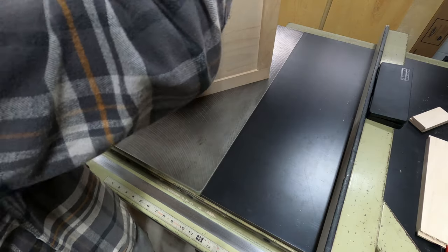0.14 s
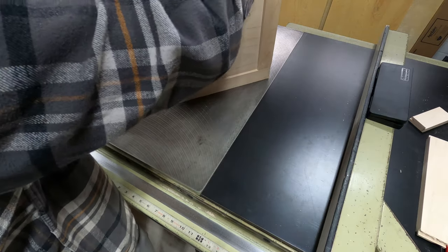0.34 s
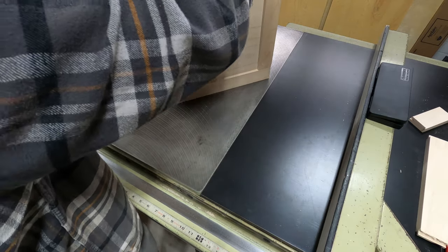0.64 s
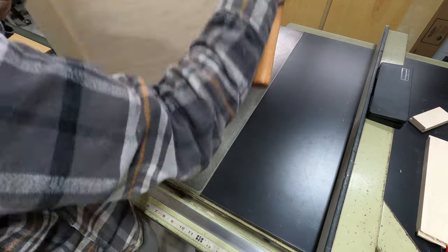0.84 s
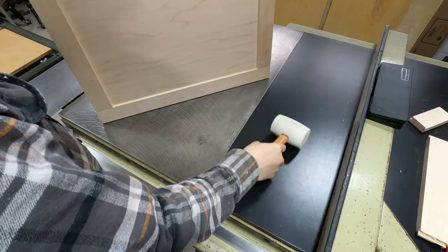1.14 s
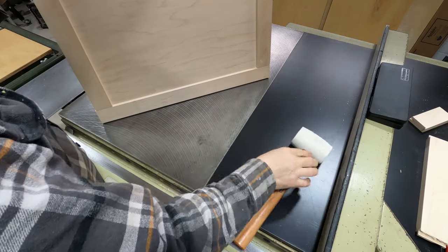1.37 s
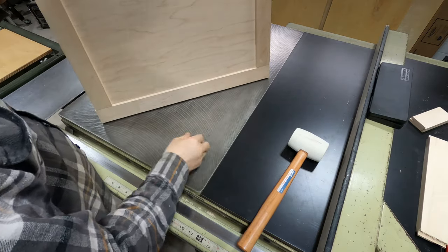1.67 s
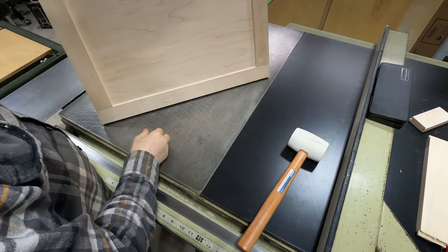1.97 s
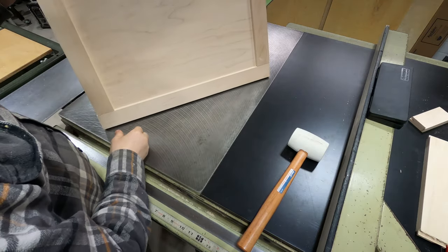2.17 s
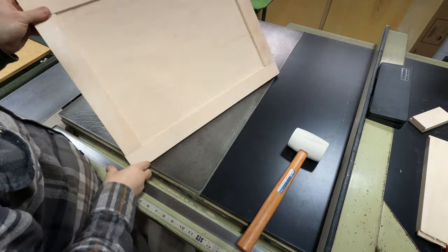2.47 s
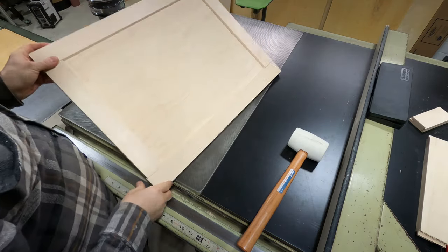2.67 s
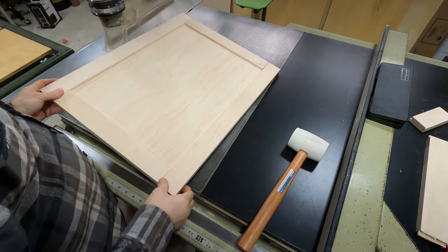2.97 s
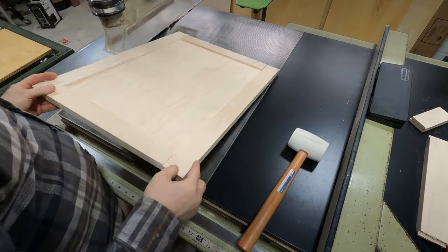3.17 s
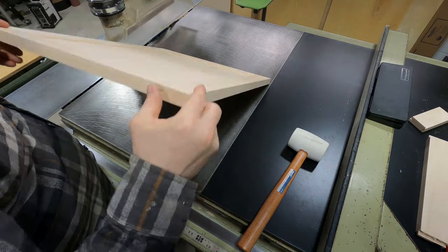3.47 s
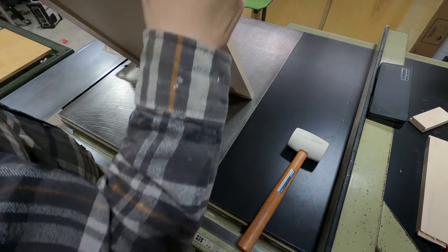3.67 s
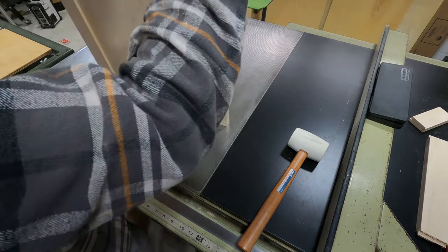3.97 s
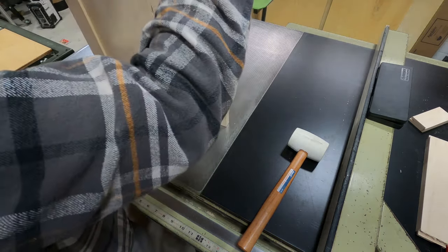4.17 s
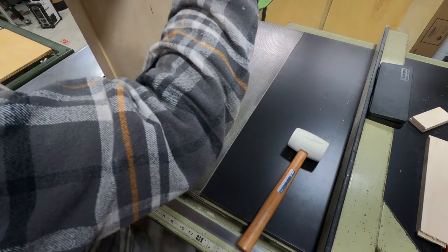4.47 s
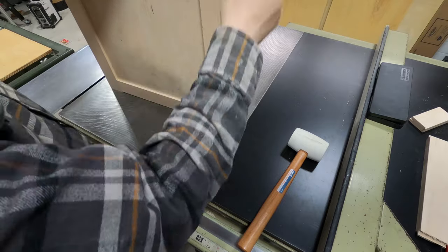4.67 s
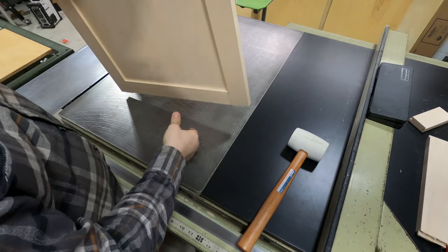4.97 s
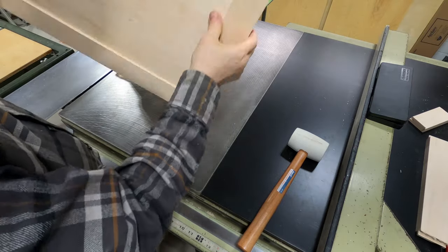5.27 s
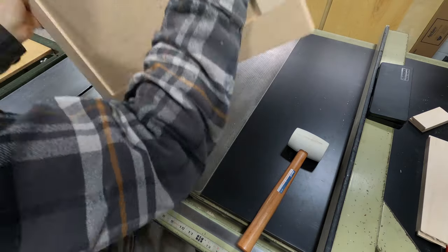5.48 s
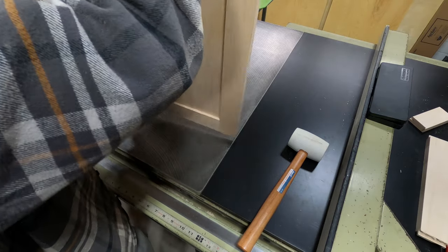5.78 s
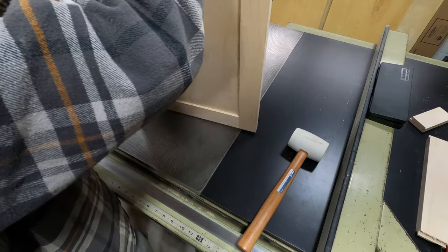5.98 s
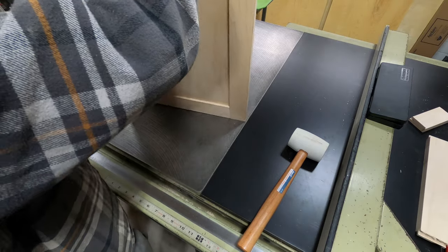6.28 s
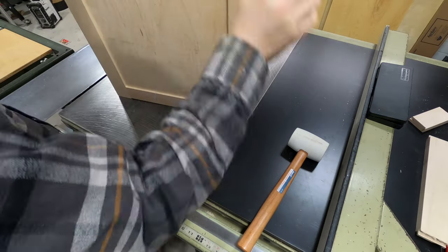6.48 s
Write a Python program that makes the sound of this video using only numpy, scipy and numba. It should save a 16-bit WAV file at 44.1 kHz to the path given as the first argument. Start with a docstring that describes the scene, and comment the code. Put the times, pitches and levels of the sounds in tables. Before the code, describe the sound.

In a workshop, a rubber mallet gives two dull, briefly ringing knocks on a wooden door frame, then clatters down on a steel table. The door is turned with soft rubs and a bump, and slides over the table with a gritty, hissing scrape. After a few lighter drags it drops on its edge in a cluster of hollow knocks. Everything sounds close, over a low rumble and ventilation hum.

```python
"""In a workshop, a rubber mallet knocks twice on a wooden door frame, which rings briefly.
At 1.4 s the mallet clatters onto a steel table. The door is then turned and set down with bumps and rubs.
From 3.5 s it slides over the table, where grit makes the wood hiss and sing; at 6.1 s it drops on its edge.
A ventilation hum and a low rumble fill the room throughout, and a limiter holds the loudest blows down."""
import sys
import numpy as np
from scipy import signal
from scipy.fft import rfft, irfft, next_fast_len
from scipy.io import wavfile
from scipy.ndimage import uniform_filter1d, minimum_filter1d, map_coordinates
from numba import njit

SR = 44100
rng = np.random.default_rng(int(sys.argv[2]) if len(sys.argv) > 2 else 0)


def transcribe(signal):
    """Save signal, clipped to [-1, 1], as a 16-bit WAV file at the path in sys.argv[1]."""
    frames = np.atleast_2d(signal).T
    limited = np.clip(frames, -1, 1)
    pcm = np.round(limited * 32767).astype(np.int16)
    wavfile.write(sys.argv[1], SR, pcm)


N = 291942

# The loose door's modes (the tones it rings with): f/Hz, level/dB, nominal time to fade by 60 dB/s
DOOR_MODES = [(102.86, -7.5, 0.42), (151.7, 2, 0.48), (198, -2.5, 0.6), (257.4, -4, 0.53),
              (296.8, -0.5, 0.89), (336.7, 4.5, 0.27), (390, -6.5, 0.55), (508.3, 4, 0.5),
              (625, -3.5, 0.32), (697, 2, 0.53), (946, -10.5, 0.33), (1176, -7.5, 0.089), (1445, -13, 0.11),
              (1590, -12.5, 0.1), (1935, -18, 0.24), (2260, -25.5, 0.39), (2817, -30, 0.054)]
# How alike left and right are for a sound close by: f/Hz, likeness/0-1
NEAR_LIKENESS = [(100, 1), (700, 0.93), (2000, 0.83), (5000, 0.73), (10000, 0.71)]


def mallet_blows():
    """Soft rubber hits the wooden frame: two strong knocks among fainter touches."""
    # t/s, strength/dB, f/Hz, dullness/dB per octave, boom/dB, click/dB, freedom to ring/0-1, bite/dB
    hits = [(0.0014, -29.5, 162, 10, -34.5, -24, 0.75, -2.5), (0.474, -22.5, 250, 14, -44, -22, 0, 13),
            (0.481, 5, 243, 15, -8, -5.5, 0.2, 3), (0.5, -6.5, 314, 12.5, -38, -20.5, 0.57, 5),
            (0.688, -3, 266, 14.5, -14.5, 0, 0.2, -10.5), (0.701, -7.5, 280, 16, -8, -10, 0.29, 3.5),
            (0.722, -22.5, 318, 28, -29, -8, 0.1, -2), (0.87, -36, 157, 17, -27.5, -13, 0.46, -10)]
    # The frame's modes: f/Hz, level/dB, nominal fade time/s
    modes = [(81.6, -21.5, 0.75), (125.6, -8, 1), (150, 0.5, 0.18), (201, -3.5, 0.082), (264, -6, 0.14),
             (293, -12.5, 0.17), (347.6, -8.5, 0.24), (545, 3, 0.14), (565, -14.5, 0.16), (620, -27, 0.36),
             (1073, -18.5, 0.15), (1338, -16.5, 0.44), (1710, -33, 0.2)]
    return knocks(hits, modes, soft_s=0.0036, ring_db=2.5, crack_db=18.5, click_db=15.5,
                  wet_db=-4.5, bend=0.72)


def mallet_laid_down():
    """The mallet's head and handle drop on the steel table and make it ring."""
    # Each touch on the table: columns as in mallet_blows
    hits = [(1.398, -19, 193, 13, -25, 24.5, 0.46, 5.5), (1.435, -11.5, 235, 12.6, -16.5, 4, 0.33, -3.5),
            (1.46, -25, 189, 2.6, -8, 7, 0.074, -3.5), (1.513, -1, 548, 6.96, -31.5, 18, 0.13, -4),
            (1.556, -20, 179, 29, -17, -4, 0.45, 2), (1.662, -26.5, 176, 5.1, -33, -18, 0.13, 8),
            (1.74, -39, 171, 7.5, -32, -15, 0.37, 19)]
    # The table's modes: f/Hz, level/dB, nominal fade time/s
    modes = [(114.7, -3, 0.31), (142.4, 5.5, 0.17), (197.4, 0, 5.0), (282, -5, 0.24), (343, -4.5, 5.0),
             (518, -2.5, 0.33), (604, -10, 0.043), (670, -4.5, 0.069), (890, -18, 0.08), (1320, -14, 0.2),
             (1760, -18, 0.23)]
    return knocks(hits, modes, soft_s=0.0013, ring_db=0.5, crack_db=18.5, click_db=-20.0,
                  wet_db=-2.0, bend=1.23)


def door_bumps():
    """Corners and edges of the door hit the table, and the door rings."""
    # Each bump: columns as in mallet_blows
    hits = [(2.638, -23.5, 420, 7.9, -20.5, -5, 0.36, -16), (3.391, -7, 295, 6.33, -49, 17, 0.42, 5.5),
            (3.426, -13.5, 340, 4.57, -35, 12, 0.3, 4), (3.927, -41.5, 202.6, 0.67, -28, 5, 0.88, 1),
            (4.19, -48, 198, 1.1, -60, -12, 0.5, -3), (4.228, -44.5, 497, 5.8, -40.5, -9, 0.35, -3.5),
            (4.999, -54, 522, 4, -51, -5.5, 0.32, 3), (5.302, -54.5, 433, 2.1, -28, 11.5, 1, -15),
            (5.312, -41.5, 480, 8.5, -24.5, 5, 1, -4), (5.874, -50.5, 813, 1.7, -56, 16.5, 0.42, 4.5),
            (6.0895, -14, 343, 6.67, -9.5, -10, 0.59, 5.5), (6.143, -16, 347, 8.6, -28, -16, 0.26, -6),
            (6.205, -3, 182, 6.55, -14, -12, 0.14, 10), (6.217, -16.5, 163, 3.93, -13, -21, 0.39, -4.5),
            (6.313, -22.5, 161, 9.5, -14.5, -6, 0.98, 3), (6.348, -24, 407, 10.2, -47, -1, 0.53, -9.5),
            (6.383, -8.5, 550, 10.45, -19, 12.5, 0.46, -3.5), (6.412, -7, 464, 8.6, -34, 1, 0.18, -17),
            (6.426, -9, 482, 11, -12, -6, 0.22, -3.5)]
    return knocks(hits, DOOR_MODES, soft_s=.0012, ring_db=-2.0, crack_db=20.5, click_db=8.0,
                  wet_db=-5.0, bend=1.176)


def knocks(hits, modes, soft_s, ring_db, crack_db, click_db, wet_db, bend):
    """Each hit rings the modes at new strengths and adds a woody crack and a very short click."""
    # Where a hit's colour (its level from bass to treble) is set, the boom first: f/Hz
    bands_hz = [100, 150, 220, 330, 500, 750, 1100, 1700, 2600, 4000, 6000]
    upper_hz = np.array(bands_hz[1:])
    bite_shape = np.exp(-(np.log2(upper_hz / 1360) / 0.99) ** 2)  # a hard edge around 1360 Hz
    travel_s, detune = .001, .015  # the trip to the microphone; the grip shifts the modes a little
    out, t = np.zeros((2, N)), np.arange(SR // 2) / SR
    hz, level, free_t60 = np.transpose(modes)[..., None]
    mode_db = level - along([(100, -3.0), (700, 6.5), (3000, -32.0)], hz)  # each hit sets its own slope
    free_t60 = np.minimum(free_t60, 0.85 * (100 / hz) ** 0.85)  # high modes die sooner
    signs = (-1) ** np.arange(len(hz))[:, None]
    onset = 1 - np.exp(-t * hz / 0.29)  # a mode takes about one cycle to start
    for start, db, pitch_hz, dullness, boom_db, sharp_db, freedom, bite_db in hits:
        octaves = np.log2(upper_hz / pitch_hz)
        loss_db = np.where(octaves > 0, dullness * abs(octaves) ** bend, -11 * octaves)
        band_db = [boom_db, *(db + bite_db * bite_shape - loss_db)]
        colour = list(zip(bands_hz, band_db))
        loose = np.clip(freedom, .1, 1)  # a hand or the table shortens the ringing
        start_db = mode_db + along(colour, hz) + ring_db + rng.normal(0, 1.5, hz.shape)
        fade_db = 60 * (t / (loose * free_t60)) ** 1.32  # holds a moment, then is choked
        tones = signs * np.sin(2 * np.pi * hz * rng.normal(1, detune, hz.shape) * t)
        ring = (amp(start_db - fade_db) * onset * tones).sum(0)

        crack_fade = 0.37 * amp(-60 * t / 0.025) + 0.22 * amp(-60 * t / (0.28 * loose))
        crack = rng.standard_normal(len(t)) * crack_fade * (1 - np.exp(-t / soft_s))
        crack[0] = 1.5  # the first jolt
        push = np.linalg.norm(crack) * (t == 0)  # the walls get the crack as one clean push
        crack_colour = [(45, boom_db - 14), *colour[:-2],
                        (6000, band_db[-1] - 8), (16000, band_db[-1] - 25)]
        crack, push = amp(crack_db) * causal(np.array([crack, push]), crack_colour)

        click = rng.standard_normal(len(t)) * amp(-60 * t / .006)
        click = causal(click, [(500, band_db[-3] - 25), *colour[-3:], (16000, band_db[-1] - 6)])
        add(out, start + travel_s, in_workshop(ring + crack, wet_db, send=ring + push))
        add(out, start + travel_s, in_workshop(amp(click_db + sharp_db) * click, wet_db=-11))
    return out


def door_slides():
    """Grit under the edge stirs the door's resonances, which drift and swell as the grip shifts."""
    # The sliding door's resonances: f/Hz, width/Hz, level/dB
    resonances = [(257, 84, 8), (595, 36, -8), (975, 41, -4), (1134, 36, -14), (1380, 280, -7),
                  (1816, 17, -2.5), (2240, 260, -9), (2810, 180, -11.5), (3294, 81, -7.5), (3683, 76, -7.5),
                  (4140, 520, -11.5), (4620, 390, -13.5), (5530, 550, -17)]
    # Four ranges of the noise (panel, rub, scrape, hiss): low f/Hz, high f/Hz
    ranges = [(200, 1200), (1200, 3000), (3000, 6200), (6200, 11000)]
    # Per range, in an average stroke: relative level/dB
    base_db = [2.5, -0.5, -7, -11.5]
    # Per range: gain/dB per dB of strength
    grows = [0.9, 1.393, 1.72, 0.86]
    # Per range: gain/dB per dB of brightness
    brightens = [-0.09, 0.85, 1.2, 0.78]
    average_db, average_bright_db = -60, -4
    hz, times, spectra = signal.stft(rng.standard_normal((2 * len(ranges) + 2, N)), SR, nperseg=1024)
    at = np.minimum(times * SR, N - 1).astype(int)
    panel = 0.3  # some grit is heard between the resonances
    for pitch_hz, width_hz, db in resonances:
        height = amp(db + 4 * wobble(7.0)[at]) * (pitch_hz / 1000) ** .45
        offset_hz = hz[:, None] - pitch_hz * (1 + .011 * wobble(5)[at])
        panel = panel + height / (1 + (2 * offset_hz / (width_hz + 0.021 * pitch_hz)) ** 2)
    grit = signal.istft(spectra * panel, SR, nperseg=1024)[1][:, :N]
    grit *= amp(1.2 * wobble(76) + 1.8 * wobble(400))  # tiny slips shared by all ranges
    moves, out = list(strokes()), 0
    for k, (low, high) in enumerate(ranges):
        level = 0
        for db, bright_db, treble_db in moves:
            change_db = grows[k] * (db - average_db) + brightens[k] * (bright_db - average_bright_db)
            level = level + amp(average_db + base_db[k] + change_db + (low >= 3000) * treble_db)
        band = lambda f: 1 / np.hypot(1, (low / (f + 1)) ** 4) / np.hypot(1, (f / high) ** 4)
        out = out + level * unit(filtered(stereo(grit[2 * k:2 * k + 2], NEAR_LIKENESS), band))
    out = out + scrape_and_hiss(hz, times, spectra[-2:], panel)
    return out * amp([[.7], [-.7]])  # a little to the left


def strokes():
    """Strength, brightness and treble change in dB, over time, of each rub and of the long slide."""
    # Wood on steel and cloth on wood: start t/s, peak t/s, end t/s, strength/dB, brightness/dB
    rubs = [(0.062, 0.108, .2, -80, 12.5), (0.255, 0.261, .31, -81, 17), (0.885, 0.97, 1.08, -86, 17.5),
            (1.39, 1.445, 1.53, -41, -22.5), (1.85, 2.052, 2.3, -72, -5.5), (2.235, 2.436, 2.7, -53, -3.5),
            (2.553, 2.629, 2.8, -50, -9.5), (2.782, 2.826, 2.97, -69.5, 12.5),
            (2.89, 3.12, 3.2, -60.5, -12.5), (3.057, 3.284, 3.45, -59.5, -5.5),
            (3.35, 3.407, 3.41, -44, -27), (4.16, 4.216, 4.26, -53.5, -12.5),
            (4.856, 4.913, 4.99, -79.5, 14), (4.93, 4.983, 5.08, -77, 11.5), (5.283, 5.32, 5.5, -62.5, 2.5),
            (5.3, 5.515, 5.75, -79.5, 14.5), (5.538, 5.66, 5.74, -63.5, 1.5),
            (5.732, 5.864, 6.0, -59, -2.5)]
    # The long slide over the table: t/s, strength/dB, brightness/dB
    slide = [(3.471, -48.5, -9), (3.57, -41.5, -14), (3.7, -40.5, -14.5), (3.78, -43, -9.5),
             (3.849, -39.5, -6), (3.876, -39, -13), (3.915, -47, -12.5), (3.933, -43.5, -2.5),
             (3.99, -44, -8), (4.069, -40, -16.5), (4.11, -47, -17), (4.177, -70.5, 7)]
    for start, peak, end, db, bright_db in rubs:
        yield db + swell(start, peak, end), bright_db, 0
    t = np.arange(N) / SR
    times, db, bright_db = np.transpose(slide)
    treble_db = -9  # leaves room for the moving scrape and hiss
    yield np.interp(t, times, db, -200, -200), np.interp(t, times, bright_db), treble_db


def scrape_and_hiss(hz, times, spectra, panel):
    """Two bands of noise rise and fall in pitch with the speed of the long slide."""
    # The bands' path: t/s, scrape f/Hz, scrape level/dB, hiss f/Hz, hiss level/dB (levels are relative)
    path = [(3.46, 2930, -60, 6900, -97), (3.53, 3400, -49, 6950, -58), (3.7, 3460, -42.5, 7640, -68),
            (3.756, 3700, -43, 8900, -56), (3.8, 3920, -37.5, 8750, -63), (3.845, 3960, -36.5, 9070, -55),
            (3.884, 3600, -45, 8850, -60.5), (3.92, 3300, -71, 7500, -60), (3.926, 3700, -41.5, 7500, -67),
            (3.95, 3600, -37.5, 8100, -61), (3.998, 3530, -47, 8160, -54), (4.044, 2960, -48.5, 8100, -54),
            (4.17, 3020, -68, 8160, -80)]
    path_s, scrape_hz, scrape_db, hiss_hz, hiss_db = np.transpose(path)
    t, out = np.arange(N) / SR, 0
    for centre_hz, db, width_octaves in (scrape_hz, scrape_db, 0.44), (hiss_hz, hiss_db, .12):
        octaves = np.log2((hz[:, None] + 1) / np.interp(times, path_s, centre_hz))
        treble_tail = amp(-15.5) * (octaves > 0)
        shape = panel * (np.exp(-(octaves / width_octaves) ** 2 / 2) + treble_tail)
        shape /= np.sqrt(np.mean(shape ** 2, 0))
        band = signal.istft(spectra * shape, SR, nperseg=1024)[1][:, :N]
        slips = amp(2.3 * wobble(45) + 3 * wobble(300))
        level = amp(np.interp(t, path_s, db, -200, -200) - 0.5)
        out = out + level * stereo(slips * band, NEAR_LIKENESS)
    return out


def door_singing():
    """Single resonances of the door sing out during the long slide."""
    # Each note: start t/s, peak t/s, end t/s, level/dB, f/Hz
    notes = [(3.53, 3.623, 3.72, -46, 1180), (3.582, 3.66, 3.78, -47.5, 591),
             (3.682, 3.805, 3.92, -43, 919), (3.7, 3.773, 3.92, -41, 1827), (3.76, 3.821, 3.9, -41.5, 1130),
             (3.916, 3.96, 4.13, -45, 964), (3.93, 3.996, 4.14, -41.5, 544),
             (3.963, 4.03, 4.12, -46.5, 2100)]
    width_hz = 45
    return fuzzy_tones([(*note, width_hz) for note in notes])


def edge_drags():
    """Uneven grit rings the door's modes for as long as an edge drags."""
    # Each drag: start t/s, peak t/s, end t/s, level/dB, favoured f/Hz
    drags = [(2.262, 2.436, 2.62, -60, 620), (2.823, 2.88, 2.93, -50, 570), (3.093, 3.12, 3.19, -60, 520),
             (3.18, 3.182, 3.3, -50, 390), (5.288, 5.33, 5.45, -54.5, 390), (5.612, 5.65, 5.73, -47.5, 476),
             (5.788, 5.856, 5.91, -46, 505)]
    modes = lambda f: sum(
        (-1) ** k * amp(db) * 1j * f * (3.6 / t60 + 12) / (hz * hz - f * f + 1j * f * (2.0 / t60 + 12))
        for k, (hz, db, t60) in enumerate(DOOR_MODES))
    grit = rng.standard_normal(N) * amp(1.2 * wobble(150))
    ringing, out = filtered(grit, modes), 0
    for start, peak, end, db, hz in drags:
        # Modes fall away by 26 dB an octave, but the upper ones never vanish.
        favour = lambda f: amp(-26 * abs(np.log2((f + 1) / hz))) + amp(-18) * (f > hz)
        out = out + amp(db + swell(start, peak, end)) * unit(filtered(ringing, favour))
    return in_workshop(out, wet_db=-14)[:, :N]


def ticks():
    """Fingers and edges tick: a few cycles of a tone with a puff of noise."""
    # Each tick: t/s, level/dB, f/Hz
    touches = [(0.961, -49.5, 2240), (1.324, -52.5, 2570), (2.628, -35, 3000), (2.797, -37, 6200),
               (3.031, -46.5, 1610), (3.2947, -43, 4470), (3.9425, -37.5, 4120), (3.9726, -36, 4200),
               (4.002, -40, 4100), (4.4071, -45, 2040), (5.3687, -49, 1760), (5.479, -47, 7750),
               (5.875, -35, 8300), (5.875, -49, 3000), (5.892, -39, 2230), (6.079, -32.5, 1540)]
    out, t = np.zeros((2, N)), np.arange(SR // 20) / SR
    for start, db, hz in touches:
        tone = np.sin(2 * np.pi * hz * t) * amp(-60 * t * hz / 14)
        puff = 0.13 * rng.standard_normal(len(t)) * amp(-60 * t / 0.019)
        add(out, start, in_workshop(amp(db) * (tone + puff), wet_db=-5.0))
    return out


def faint_tones():
    """Three faint, fuzzy tones swell and fade."""
    # Each tone: start t/s, peak t/s, end t/s, level/dB, f/Hz, width/Hz
    tones = [(1.004, 1.339, 1.35, -64, 1035, 257), (1.795, 1.94, 2.14, -82.5, 5840, 496),
             (1.925, 2.126, 2.4, -77.5, 4620, 450)]
    return fuzzy_tones(tones)


def squeaks():
    """Very quiet, thin whistles waver and glide."""
    # Each squeak: start t/s, end t/s, first f/Hz, last f/Hz
    glides = [(.28, .375, 5700, 6150), (.385, .425, 6300, 5900), (.42, .45, 6000, 7300),
              (.86, .9, 6700, 7450), (.905, .975, 6900, 7200), (.915, .955, 5300, 5500),
              (.965, 1.012, 5400, 4550), (1.012, 1.03, 7100, 6500)]
    out, waver = np.zeros((2, N)), wobble(50)
    for start, end, first_hz, last_hz in glides:
        size = round((end - start) * SR)
        shake = waver[round(start * SR):][:size]
        hz = np.linspace(first_hz, last_hz, size) * (1 + .006 * shake)
        level = amp(-84 + 2 * shake) * np.hanning(size) ** .5
        add(out, start, (level * np.sin(2 * np.pi * np.cumsum(hz) / SR))[None])
    return out


def room_tone():
    """A wavering low rumble and the hum of the ventilation, both made of noise."""
    # The rumble over time: t/s, level/dB
    rumble_levels = [(0.0, -40.5), (0.6, -53.5), (0.9, -48), (1.499, -53.5), (1.801, -44), (2.9, -50),
                     (3.3, -47), (3.999, -47), (5.071, -52.5), (5.48, -46), (5.769, -57), (6.29, -42.5),
                     (6.62, -48)]
    # The rumble's colour: f/Hz, relative level/dB
    rumble_colour = [(12, -20), (20, -5), (54, -1.5), (81, -3.5), (113, -4.5), (216, -14), (390, -71),
                     (660, -120)]
    # The ventilation's colour: f/Hz, relative level/dB
    hum_colour = [(120, -22.5), (200, -5.5), (292, -11), (362, -13.5), (464, -18), (667, -23), (928, -24.5),
                  (1190, -22), (1860, -34.5), (2260, -39.5), (7550, -44.5), (10300, -45), (13400, -69),
                  (22000, -120)]
    rumble_db = np.interp(np.arange(N) / SR, *np.transpose(rumble_levels))
    rumble = amp(rumble_db + 0.22 * wobble(31)) * room_noise(rumble_colour)
    hum = amp(-60.5 + 0.39 * wobble(0.88)) * room_noise(hum_colour)
    return rumble + hum


def room_noise(colour):
    """Stereo noise of rms 1, shaped by (f/Hz, level/dB) points."""
    # How alike left and right are in the background: f/Hz, likeness/0-1
    likeness = [(100, 0.98), (300, 0.91), (700, 0.71), (1500, 1), (5000, 0.29), (10000, 0.24)]
    noise = stereo(rng.standard_normal((2, N)), likeness)
    return unit(filtered(noise, lambda hz: amp(along(colour, hz))))


def in_workshop(x, wet_db, send=None):
    """The direct sound x plus, at wet_db, the walls' echo of it (or of send)."""
    # How long the echo lasts: f/Hz, time to fade by 60 dB/s
    fade_times = [(100, 0.54), (400, 0.27), (1500, 0.37), (4000, 0.53), (9000, 0.36)]
    # How alike the echo is left and right: f/Hz, likeness/0-1
    likeness = [(100, 1), (500, 0.97), (1500, 0.64), (5000, .4)]
    # The echo's colour: f/Hz, level/dB
    wall_colour = [(200, -1.5), (1000, 3), (3000, -2), (8000, -2)]
    size = SR * 2 // 3
    hz, t, spectra = signal.stft(rng.standard_normal((2, size)), SR, nperseg=256)
    fade = amp(-60 * t / along(fade_times, hz)[:, None])
    tail = signal.istft(spectra * fade, SR, nperseg=256)[1][:, :size]
    tail = stereo(tail / np.linalg.norm(tail[0]), likeness)
    tail = filtered(tail, lambda f: amp(along(wall_colour, f)))
    delayed = np.pad(x if send is None else send, (300, 0))
    out = amp(wet_db) * signal.fftconvolve(delayed[None], tail, axes=1)
    out[:, :len(x)] += x
    return out


def fuzzy_tones(rows):
    """For each row, a narrow band of noise swells and fades around one pitch."""
    pair = np.zeros((2, N))
    for start, peak, end, db, hz, width_hz in rows:
        first, last = round((start - .05) * SR), round((end + .05) * SR)
        t = np.arange(last - first) / SR
        knots = rng.standard_normal((4, int(len(t) * width_hz / SR) + 4))
        curves = np.array([map_coordinates(row, [t * width_hz]) for row in knots])
        phase = 2 * np.pi * hz * t
        tone = unit(curves[::2] * np.cos(phase) + curves[1::2] * np.sin(phase))
        pair[:, first:last] += amp(db + swell(start, peak, end)[first:last]) * tone
    return stereo(pair, NEAR_LIKENESS)


def swell(start, peak, end):
    """A rounded rise and fall in dB: 0 at the peak, -16 at start and end."""
    t = np.arange(N) / SR
    return -16 * np.maximum((peak - t) / (peak - start), (t - peak) / (end - peak)) ** 1.61


def amp(db):
    """Turn decibels into a gain."""
    return 10 ** (np.asarray(db) / 20)


def unit(x):
    """Scale x to an rms (average size) of 1."""
    return x / np.sqrt(np.mean(x ** 2) + 1e-20)


def along(points, hz):
    """Read between (f/Hz, value) points on a log frequency axis."""
    f, values = np.transpose(points)
    return np.interp(np.log(hz + 1), np.log(f + 1), values)


def filtered(x, response):
    """Give each frequency in x the gain response(f)."""
    size = next_fast_len(x.shape[-1] + 8192)
    return irfft(rfft(x, size) * response(np.fft.rfftfreq(size, 1 / SR)), size)[..., :x.shape[-1]]


def causal(x, points):
    """Shape x by (f/Hz, level/dB) points with nothing sounding early (minimum phase)."""
    size = next_fast_len(x.shape[-1] + 4096) * 2
    cepstrum = irfft(np.log(amp(along(points, np.fft.rfftfreq(size, 1 / SR)))), size)
    cepstrum[1:size // 2] *= 2
    cepstrum[size // 2 + 1:] = 0
    return irfft(rfft(x, size) * np.exp(rfft(cepstrum)), size)[..., :x.shape[-1]]


def wobble(rate):
    """A smooth curve through rate random values a second."""
    return map_coordinates(rng.standard_normal(int(N * rate / SR) + 4), [np.arange(N) * rate / SR])


def stereo(pair, likeness):
    """Blend two unrelated signals into a left and a right that are partly alike."""
    turn = lambda hz: np.arccos(np.clip(along(likeness, hz), 0, 1)) / 2
    mid, side = filtered(pair, lambda hz: np.array([np.cos(turn(hz)), np.sin(turn(hz))]))
    return np.array([mid + side, mid - side])


def add(out, start, sound):
    """Mix a sound into out at start seconds."""
    part = out[:, round(start * SR):][:, :sound.shape[1]]
    part += sound[:, :part.shape[1]]


@njit
def held(level, fall):
    """Hold each peak, letting it sink by the factor fall each sample."""
    out = level.copy()
    for i in range(1, len(out)):
        out[i] = max(out[i], out[i - 1] * fall)
    return out


def limiter(x, knee_db, slope, fall_db_per_s, smooth_s):
    """Turn the sound down while its held peak is above the knee."""
    level = held(np.abs(x).max(0), float(amp(-fall_db_per_s / SR)))
    gain = (1 + (level / amp(knee_db)) ** 2) ** (-slope / 2)
    size = int(smooth_s * SR)
    return x * uniform_filter1d(minimum_filter1d(gain, size), size)


def scene():
    """All the sounds together, as they reach the microphones."""
    return (mallet_blows() + mallet_laid_down() + door_bumps() + ticks() + door_slides() + edge_drags()
            + faint_tones() + door_singing() + squeaks() + room_tone())


def record(dry):
    """A fast limiter holds the blows down; the microphones dull the treble and the left hears late."""
    # The microphones' treble loss: f/Hz, level/dB
    treble_loss = [(8500, -2), (10400, -11), (11500, -16.5), (15000, -36)]
    left_late_s, top_hz = .000024, 15700
    limited = limiter(dry, knee_db=-8.5, slope=0.45, fall_db_per_s=170.0, smooth_s=0.0016)
    delay = lambda hz: np.exp(-2j * np.pi * hz * np.array([[left_late_s], [0]]))
    return filtered(limited, lambda hz: delay(hz) * amp(along(treble_loss, hz)) * (hz < top_hz))


dry = scene()
out = record(dry)
transcribe(out)
```